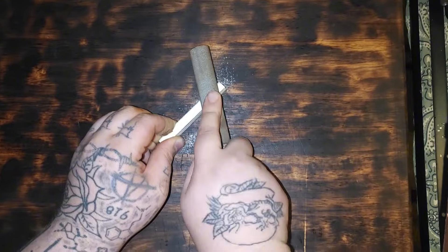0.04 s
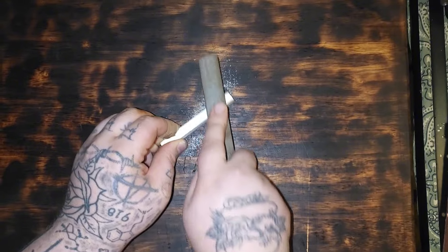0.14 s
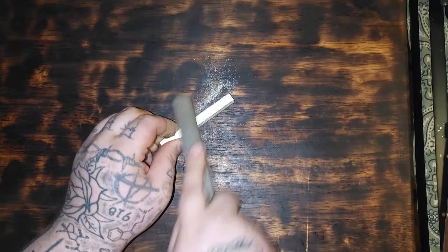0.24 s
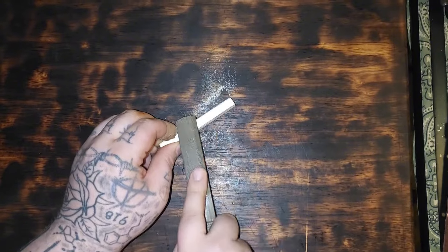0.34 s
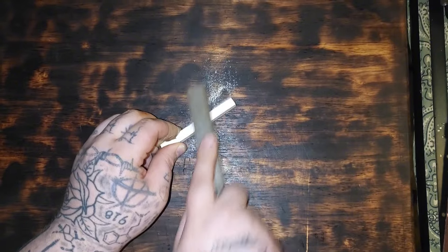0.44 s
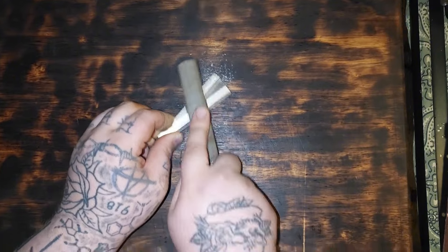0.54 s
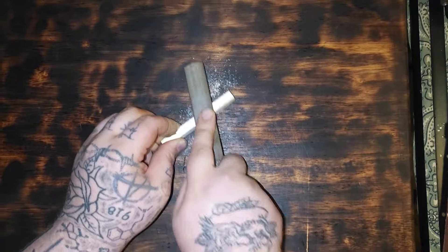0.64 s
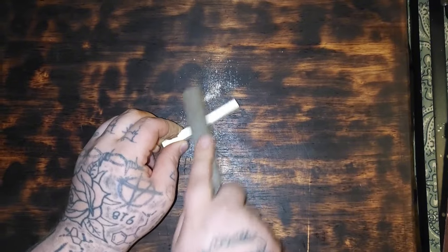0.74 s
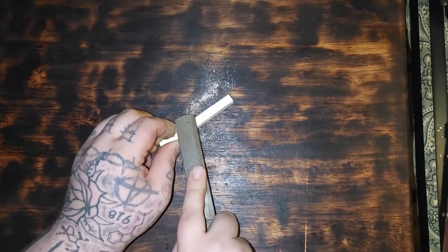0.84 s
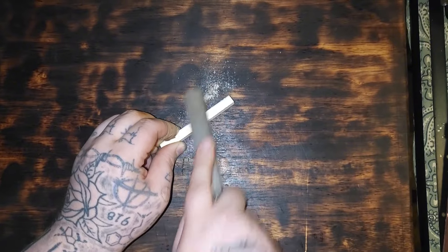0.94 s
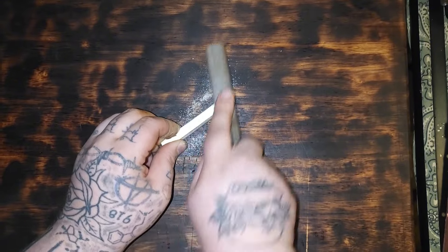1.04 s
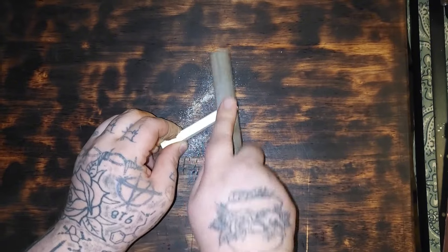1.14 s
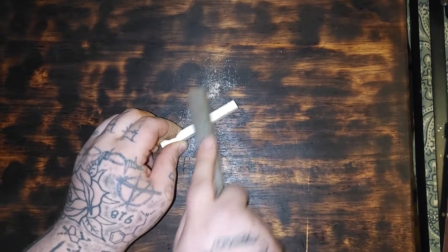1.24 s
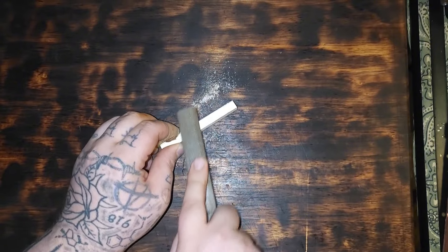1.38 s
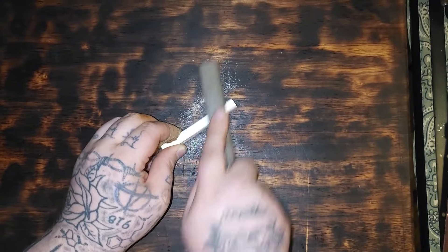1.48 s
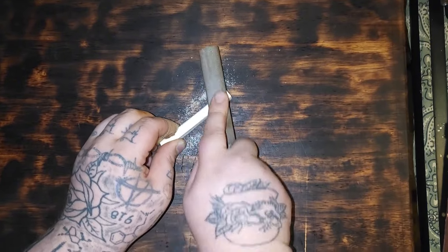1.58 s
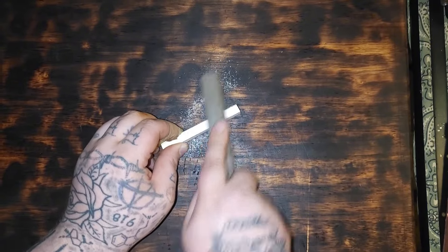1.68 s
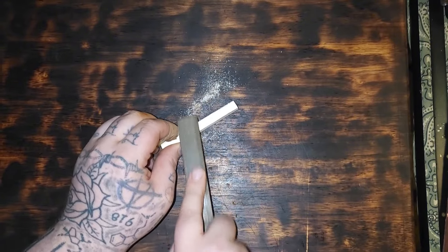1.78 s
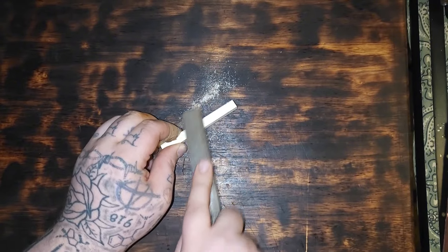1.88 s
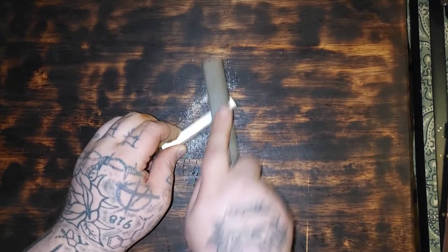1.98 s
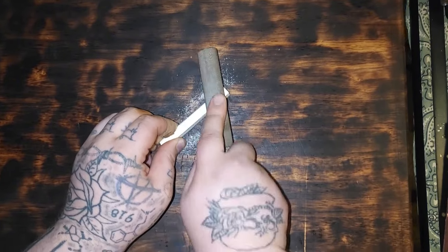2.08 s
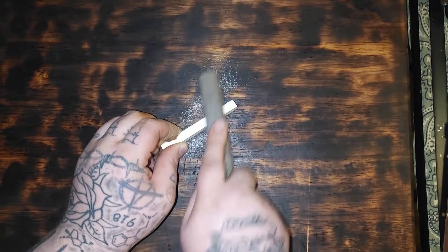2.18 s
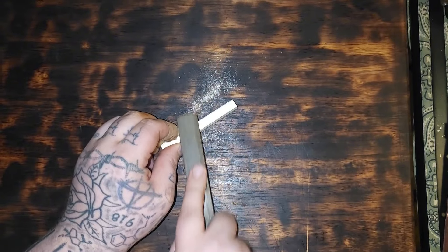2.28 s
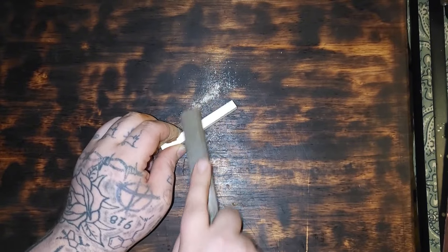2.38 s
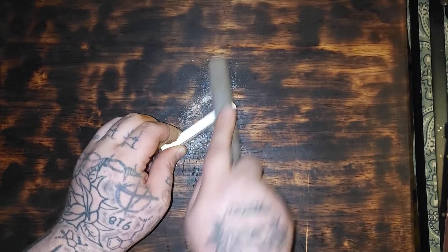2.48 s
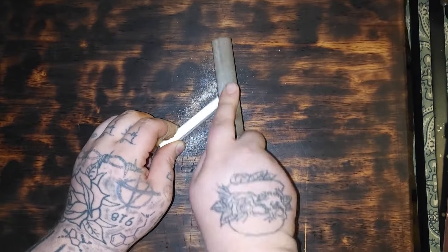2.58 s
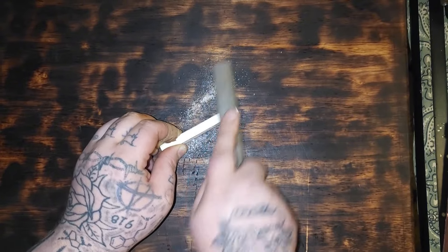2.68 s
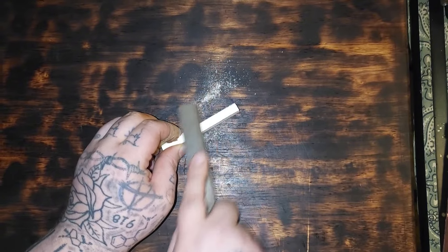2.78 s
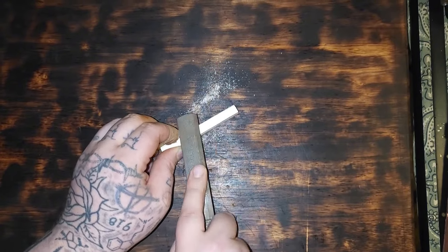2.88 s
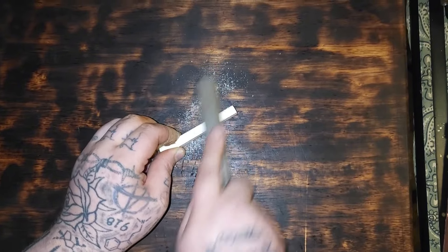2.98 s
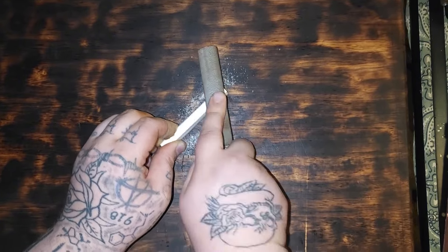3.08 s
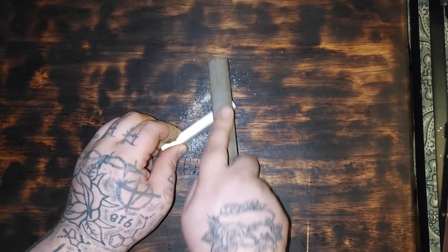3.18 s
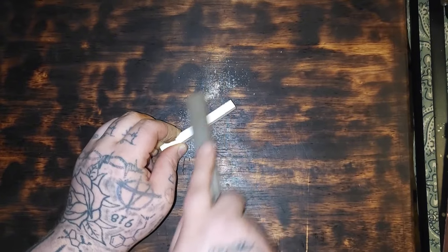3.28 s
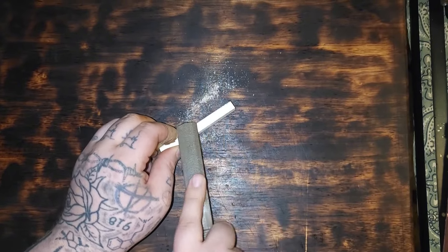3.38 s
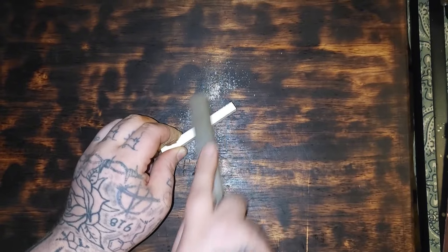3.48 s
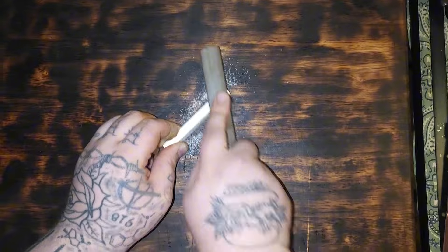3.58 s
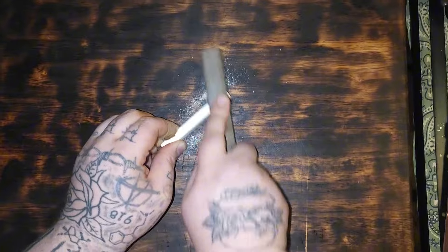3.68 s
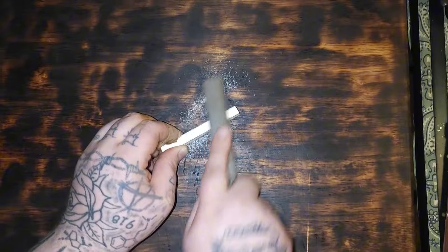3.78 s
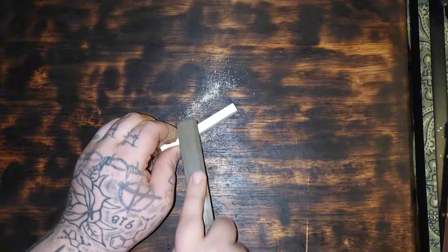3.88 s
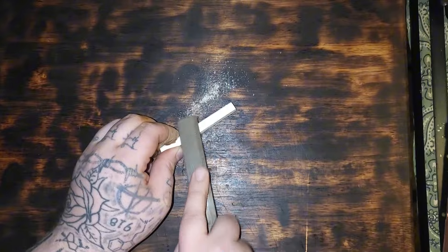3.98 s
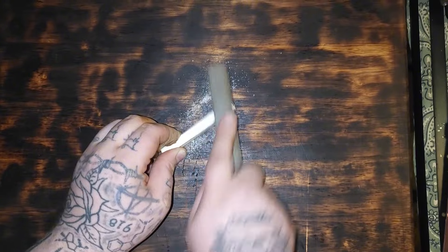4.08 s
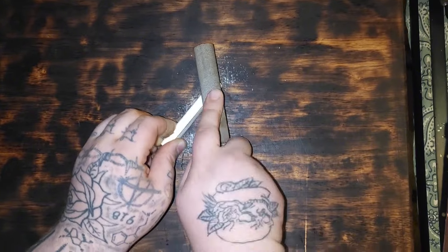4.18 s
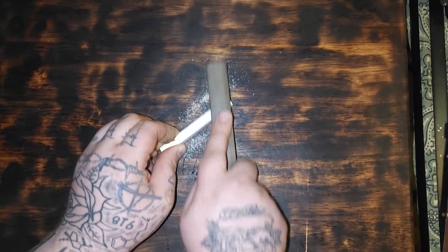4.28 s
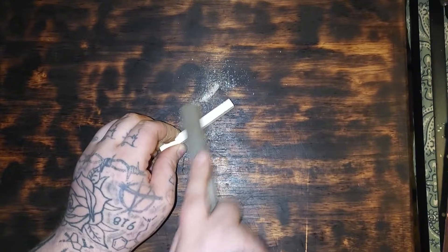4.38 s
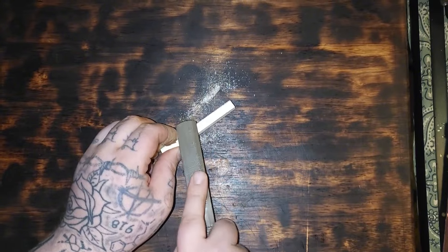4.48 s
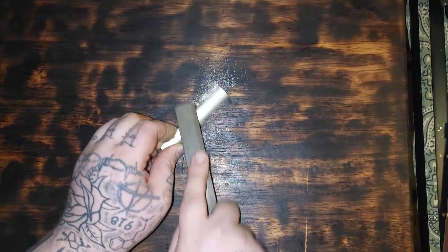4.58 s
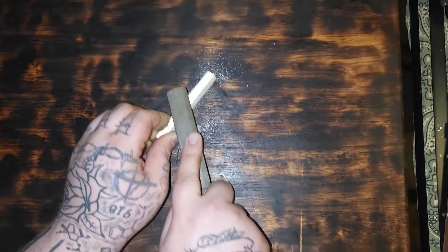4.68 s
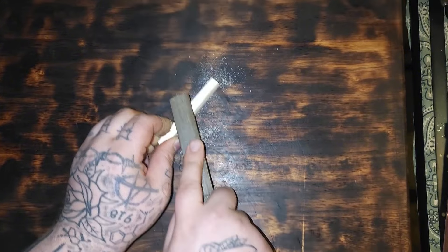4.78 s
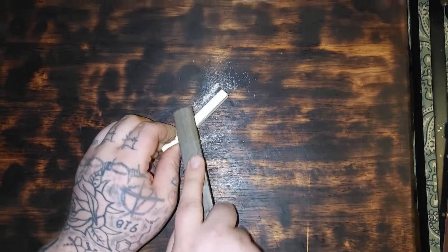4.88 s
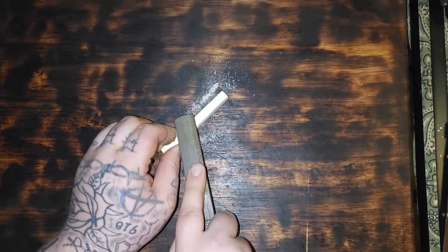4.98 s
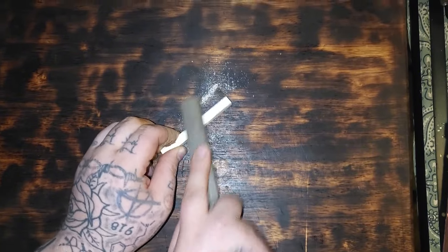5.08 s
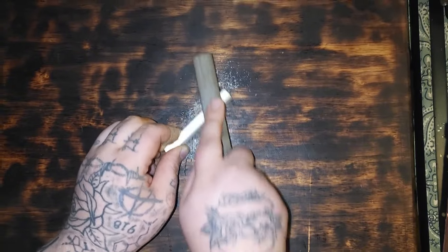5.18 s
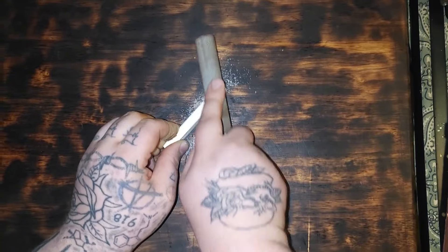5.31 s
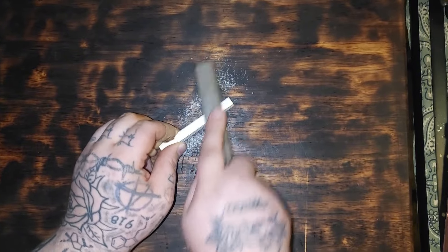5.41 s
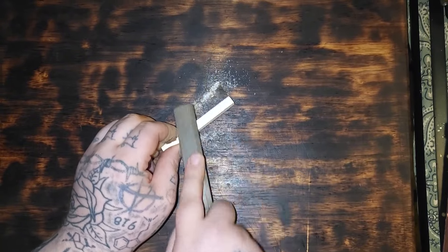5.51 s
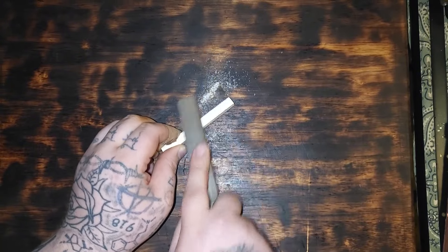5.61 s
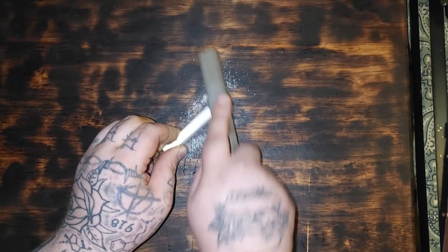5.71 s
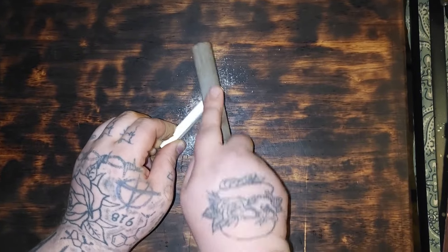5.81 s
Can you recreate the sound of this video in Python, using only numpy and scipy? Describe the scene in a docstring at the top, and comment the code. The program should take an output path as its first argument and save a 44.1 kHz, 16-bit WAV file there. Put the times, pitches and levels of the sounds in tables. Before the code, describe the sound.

A coarse metal rasp saws back and forth on a thin wooden stick, about two gritty strokes a second, rumbling a hollow wooden table up close.

```python
"""Rasping a thin stick

A steel rasp works back and forth on a stick held against a wooden table, close to the microphone.
On each push, rows of teeth bite ever slower and shake the table; noise pulls are lighter and duller.
Noise bursts through resonant bodies make snags, stick taps and one knock; blade modes ring faintly.
A low two-tone hum and filtered-noise air lie under a small room of diffuse echoes."""
import sys
import numpy as np
from scipy import signal
from scipy.fft import rfft, irfft
from scipy.io import wavfile
from scipy.ndimage import uniform_filter1d

SR = 44100
rng = np.random.default_rng(int(sys.argv[2]) if len(sys.argv) > 2 else 0)


def to_wav(sig):
    """Store sig (one row per channel, or 1-D mono) as 16-bit WAV at the path in sys.argv[1].

    Samples outside -1..1 are clipped; the rate is SR.
    """
    pcm = np.clip(np.atleast_2d(sig), -1, 1) * 32767
    pcm = np.round(pcm).astype(np.int16)
    wavfile.write(sys.argv[1], SR, pcm.T)  # frames by channels


N = 257984
TIME_S = np.arange(N) / SR
EARS = np.array([[1], [-1]])  # sign at left, right

# All levels are relative unless marked otherwise.
# Forward strokes: [crest_s, rise_s, hold_s, shake_db, scrape_db, start_teeth_hz, crest_teeth_hz]
PUSH_STROKES = [(0.46, 0.056, 0.014, -15.5, -30.5, 622, 399), (.998, 0.096, 0.067, -17, -33, 718.7, 386),
                (1.497, 0.093, 0.01, -15, -29, 519.8, 368.9), (1.98, 0.11, 0.017, -13.5, -31, 680.5, 330.6),
                (2.481, 0.1, 0.045, -14, -30, 678, 345.3), (3.01, 0.079, 0.0097, -14.5, -30.5, 640, 254.7),
                (3.538, 0.1, .018, -13.5, -29.5, 618.2, 265.6),
                (4.082, 0.1, .011, -13, -29.5, 700.6, 310.4), (4.577, 0.033, 0.026, -19, -38, 676, 391.5),
                (5.167, .12, 0.0053, -14, -30.5, 459.6, 365.3),
                (5.669, 0.06, 0.047, -15.5, -32.5, 494.5, 367.6)]
# Drags, firm on the way back, light when skidding or set down: [start_s, length_s, shake_db, scrape_db]
PULL_STROKES = [(-.081, 0.092, -26.5, -40.5), (0.197, 0.12, -26, -37), (0.577, 0.016, -32.5, -34.5),
                (0.734, 0.087, -25, -39.5), (1.187, 0.12, -23, -37.5), (1.674, 0.13, -22, -35.5),
                (2.134, .04, -54, -55), (2.175, 0.14, -25, -38), (2.681, 0.13, -23, -37),
                (3.13, 0.077, -40, -43), (3.239, .115, -23.5, -37), (3.692, 0.063, -33, -47),
                (3.788, 0.08, -20.5, -33.5), (4.225, 0.076, -39, -50.5), (4.327, 0.1, -23, -37),
                (4.896, 0.069, -35, -64), (5.265, 0.04, -23, -36.5), (5.336, 0.049, -39, -49),
                (5.414, 0.095, -22, -34.5)]
# Spans where the faint resting rub between strokes is quieter: [from_s, to_s]
QUIET_RUB_SPANS = [(.62, 0.9), (4.7, 5.02)]

# Stroke settings, each: [table_shake, scrape]
# Level gained while a push leans in [db, db]
LEAN_IN_DB = (17, 14.5)
# Exponent of that gain; above 1 the level rises early and flattens toward the crest [no unit, no unit]
LEAN_IN_CURVE = (0.97, 1.43)
# Pull weaker at its ends than halfway [db, db]
PULL_ARCH_DB = (2.5, 3)
# Slopes before and after strokes [db_per_s, db_per_s]
ONSET_DB_PER_S = (900, 640)
PUSH_FALL_DB_PER_S = (488, 356)
PULL_FALL_DB_PER_S = (360, 349)
# Rasp only lying on the stick while the hand turns round [db, db]
RESTING_DB = (-45.5, -56.5)
# Spread of the uneven hand pressure [db, db]
PRESSURE_SPREAD_DB = (1.5, 1)
PRESSURE_RATE_HZ, QUIET_RUB_DB = 35, -11.5
# Tooth rate halves in HALVING_S, down to a share of the crest rate
HALVING_S, SLOWEST_SHARE = 0.068, 0.93

# Table top outline: [freq_hz, level_db]
TABLE_OUTLINE = [(60, -29), (150, -24), (225, -21), (270, -11), (400, -6), (480, -14), (650, -14.5),
                 (900, -17.5), (1250, -21), (1550, -40), (3000, -79.5)]
# Table modes; a negative one is a node at the microphone: [freq_hz, width_hz, level_db]
TABLE_RESONANCES = [(290, 21, 6.5), (359.3, 38.7, 11.5), (397.8, 34.4, 5.5), (640, 58, 2), (721, 33, -25.5),
                    (773, 44, 6.5), (1197.3, 56, 14.5)]
# Lowest table mode, stronger when leaned on: [freq_hz, width_hz, level_db]
PRESSED_RESONANCE = (277, 18, 5.6)
# Scrape outlines on push and pull: [freq_hz, level_db]
PUSH_OUTLINE = [(500, -7.5), (1100, 3.5), (1600, -1), (2800, -1), (4500, -2.5), (6200, -5.5), (8100, -7.5),
                (9500, -21.5), (11400, -12), (16000, -20)]
PULL_OUTLINE = [(500, -7.5), (1100, -1), (1600, 0.5), (2450, 1.5), (3400, -1), (4900, -6), (6300, -6),
                (8100, -9), (9500, -21.5), (11400, -14.5), (16000, -18)]
# Modes of rasp and stick: [freq_hz, width_hz, level_db]
RASP_RESONANCES = [(1389, 19, 7.9), (1558, 13, 8.1), (1835, 31, 6.2), (2378, 70, 6.7), (3167, 46, 10.8),
                   (3230, 21, 8.5), (3478, 26, 9.3)]

# Tooth snags and breaks free: [time_s, snap_db, thump_db]
SNAG_BLOWS = [(.193, -17.5, -39), (.375, -20, -22.5), (.419, -21, -26), (.474, -22, -10.5),
              (.875, -23, -34), (1.003, -12.5, -3), (1.362, -17, -18.5), (1.418, -20, -23),
              (1.496, -24, -3.5), (1.669, -36, -15), (2.001, -11.5, -10.5), (2.478, -14, -4.5),
              (2.918, -13.5, -21), (2.995, -10, -10), (3.023, -17, -11), (3.127, -17.5, -49),
              (3.399, -13.5, -20), (3.542, -9, -5), (3.945, -12, -22.5), (4.076, -5.5, -38),
              (4.086, -15, -4), (4.327, -22, -11), (5.047, -34, -16.5), (5.165, -15, -10), (5.178, -14, -8),
              (5.321, -13, -31), (5.665, -12.5, -7), (5.687, -7.5, -10)]
# Stick scuffs against the table: [time_s, clack_db, thump_db]
TAP_BLOWS = [(.1, -23.5, -28), (2.045, -30, -53), (3.141, -14, -28), (3.6, -33, -45), (3.675, -22.5, -27),
             (4.22, -31, -28), (4.524, -31, -31), (4.725, -45, -38), (5.225, -36, -51), (5.26, -26, -18)]
# Rasp slips and strikes: [time_s, crack_db, thump_db]
KNOCK_BLOWS = [(.5712, 1, -4)]
# Outlines of snapping fibre, tapped stick, struck rasp: [freq_hz, level_db]
SNAP_OUTLINE = [(400, -14), (1100, 9.5), (3500, -4.5), (5800, 9), (7800, 3), (9500, -14), (11500, -4),
                (16000, 3.5)]
TAP_OUTLINE = [(300, -16), (950, -5), (1400, 2), (2000, -16), (5500, -10.5), (9500, -27), (16000, -14.5)]
KNOCK_OUTLINE = [(100, -90), (700, 3), (2200, 5), (4500, 0.5), (5400, -1), (6100, -3.5), (8000, 1.5),
                 (9400, -16), (12000, -7), (16000, -29)]
# Modes of tapped stick, struck rasp: [freq_hz, width_hz, level_db]
STICK_RESONANCES = [(1440, 420, 3)]
KNOCK_RESONANCES = [(1190, 130, 10), (1600, 200, -8), (1965, 200, 0), (2358, 200, 8), (3170, 250, 4),
                    (4400, 300, 5), (7680, 300, 3)]
# Lasting ring of the steel blade: [freq_hz, level_db]
BLADE_TONES = [(1862, -4), (3160, 0), (3222, -4)]

# Appliance hum: [freq_hz, rms_db]
HUM_TONES = [(58.2, -49), (96.4, -40)]
# Room air spectrum: [freq_hz, level_db_per_hz]
AIR_OUTLINE = [(20, -20), (55, 9.5), (130, 1.5), (210, -2.5), (370, -2.5), (700, -15.5), (1500, -24),
               (3000, -47), (7000, -28.5), (9500, -49.5), (12000, -34), (16000, -48)]


def undb(db):
    """Amplitude gain from dB."""
    return 10 ** (np.asarray(db) / 20)


def unit(x):
    """Scale to rms 1."""
    return x / np.sqrt(np.mean(x ** 2))


def steady(x, span_s):
    """Even out the running rms over span_s to about 1, keeping the faster grain."""
    power = np.abs(uniform_filter1d(x ** 2, max(int(span_s * SR), 8)))
    return x / np.sqrt(power + 1e-12)


def response(outline, modes=(), size=8192):
    """Causal, minimum-phase impulse response of a body with this outline and these resonances."""
    hz = np.arange(size // 2 + 1) * SR / size + 1
    points = np.array(outline, float)
    db = np.interp(np.log(hz), np.log(points[:, 0]), points[:, 1])
    for centre_hz, width_hz, peak_db in modes:
        db = db + peak_db / (1 + (2 * (hz - centre_hz) / width_hz) ** 2)
    # fold the cepstrum to positive time
    cepstrum = irfft(np.log(undb(db)))
    cepstrum[1:size // 2] *= 2
    cepstrum[size // 2 + 1:] = 0
    return irfft(np.exp(rfft(cepstrum)))[:size // 2]


def ring(force, body):
    """Force (one channel or two) sounding through an impulse response."""
    kernel = body if force.ndim == 1 else body[None]
    return signal.fftconvolve(force, kernel)[..., :N]


def walk(rate_hz):
    """Smooth random wander of rms 1."""
    step = max(int(SR / rate_hz), 2)
    held = np.repeat(rng.standard_normal(N // step + 1), step)
    return unit(uniform_filter1d(held, step)[:N])


def strokes(table, pressed, push_s=0.134, follow_s=0.0824):
    """The rasp goes forward around each crest and is drawn back in between."""
    shake, scrape = effort(0), effort(1)
    left_s, tooth_hz = to_stall()
    pushing = (left_s < push_s) & (left_s > -follow_s)
    forward = uniform_filter1d(1. * pushing, size=400)
    pushed = push(pressed, shake, scrape, tooth_hz)
    pulled = pull(table, shake, scrape)
    return forward * pushed + (1 - forward) * pulled


def push(table, shake, scrape, tooth_hz, skim_db=-6):
    """Each row of teeth rocks the table and tears a burst of fibres."""
    bite = np.cos(2 * np.pi * tooth_phase(tooth_hz, jitter=0.15))
    grip = np.exp(0.6 * bite)
    tearing = undb(10) * unit(rng.standard_normal(N) * grip)
    force = bite * undb(3.5 * walk(300)) + tearing
    body = ring(force, table)
    # fast-skimming teeth drive the low modes less
    low = signal.sosfiltfilt(signal.butter(4, 450, fs=SR, output="sos"), body)
    skim = np.clip(np.log2(tooth_hz / 380), 0, 1)
    body = steady(body + (undb(skim_db * skim) - 1) * low, 0.017)
    hiss = scrape_noise(grip * undb(1.2 * walk(150)), PUSH_OUTLINE,
                        rate_hz=9000, spread_db=-1.0, side_db=-2.0, shift_db=1.98)
    return shake * body + scrape * hiss


def pull(table, shake, scrape, judder_db=1.0):
    """The backs of the teeth skid unevenly over the wood."""
    grip = undb(judder_db * walk(220))
    body = steady(ring(rng.standard_normal(N) * grip, table), 0.047)
    hiss = scrape_noise(grip, PULL_OUTLINE, rate_hz=11000, spread_db=0.0, side_db=-1.5, shift_db=3.0)
    return shake * body + scrape * hiss


def to_stall():
    """Seconds to the nearest push crest, and the tooth rate, which falls as the teeth dig in."""
    crest_s, *_, top_hz, crest_hz = np.transpose(PUSH_STROKES)
    nearest = np.searchsorted((crest_s[1:] + crest_s[:-1]) / 2, TIME_S)
    left_s = crest_s[nearest] - TIME_S
    slowing = np.maximum(2 ** (left_s / HALVING_S), SLOWEST_SHARE)
    return left_s, np.minimum(crest_hz[nearest] * slowing, top_hz[nearest])


def tooth_phase(tooth_hz, jitter):
    """Unevenly spaced rows of teeth passed so far."""
    return np.cumsum(tooth_hz * np.exp(jitter * walk(400))) / SR


def scrape_noise(grip, outline, rate_hz, spread_db, side_db, shift_db):
    """Fibres tear across the blade: ears get different grains; colour shifts as the contact moves."""
    body = response(outline, RASP_RESONANCES)
    mid = ring(crackle(rate_hz, spread_db) * grip, body)
    side = ring(crackle(rate_hz, spread_db) * grip, body)
    hiss = steady(mid, 0.068) + EARS * undb(side_db) * steady(side, 0.045)
    for hz in np.geomspace(1700, 6500, 5):
        band = signal.lfilter(*signal.iirpeak(hz, 4, fs=SR), hiss)
        hiss = hiss + (undb(shift_db * walk(12)) - 1) * band
    return hiss


def crackle(rate_hz, spread_db):
    """Tearing fibres: dense random clicks, with sizes spread exponentially in dB."""
    size = undb(spread_db * np.minimum(rng.exponential(size=N), 3.8))
    clicks = rng.random(N) < rate_hz / SR
    return unit(clicks * size * rng.standard_normal(N))


def effort(layer):
    """Gain of shake (layer 0) or scrape (layer 1): strokes over the faint rub of the resting rasp."""
    in_span = sum(1. * ((TIME_S > from_s) & (TIME_S < to_s)) for from_s, to_s in QUIET_RUB_SPANS)
    quieter = uniform_filter1d(in_span, size=1500)
    power = undb(RESTING_DB[layer] + QUIET_RUB_DB * quieter) ** 2
    for db in (*push_db(layer), *pull_db(layer)):
        heard = db > -90
        power[heard] += undb(db[heard]) ** 2
    return np.sqrt(power) * undb(PRESSURE_SPREAD_DB[layer] * walk(PRESSURE_RATE_HZ))


def push_db(layer):
    """Level of every push: the hand leans in up to the crest, holds and lets go."""
    for crest_s, rise_s, hold_s, *peak_db, _ in PUSH_STROKES:
        early_s = np.maximum(crest_s - TIME_S, 0)
        swell = LEAN_IN_DB[layer] * (early_s / rise_s) ** LEAN_IN_CURVE[layer]
        attack = ONSET_DB_PER_S[layer] * np.maximum(early_s - rise_s, 0)
        release = PUSH_FALL_DB_PER_S[layer] * np.maximum(TIME_S - crest_s - hold_s, 0)
        yield peak_db[layer] - swell - attack - release


def pull_db(layer):
    """Level of every pull: quick start, shallow arch as the hand speeds up and slows, release."""
    for start_s, length_s, *peak_db in PULL_STROKES:
        position = np.clip(2 * (TIME_S - start_s) / length_s - 1, -1, 1)
        arch = PULL_ARCH_DB[layer] * position ** 2
        attack = ONSET_DB_PER_S[layer] * np.maximum(start_s - TIME_S, 0)
        release = PULL_FALL_DB_PER_S[layer] * np.maximum(TIME_S - start_s - length_s, 0)
        yield peak_db[layer] - arch - attack - release


def catches(snap_db=8, thump_db=4):
    """Teeth catch as each pull sets off, as hard as the pull itself: rows like those of the snags."""
    return [(start_s, scrape_db + snap_db, shake_db + thump_db)
            for start_s, _, shake_db, scrape_db in PULL_STROKES if start_s > 0]


def blows(rows, body, table, crunch_s, lead_s, thump_db, size=1024):
    """Each blow is a brief noise crunch in the struck part and one shove into the table."""
    out = np.zeros(2 * N)
    t = np.arange(size) / SR - size / 4 / SR
    swell = np.exp(np.minimum(t / lead_s, -t / crunch_s))
    shove = np.convolve(table, np.hanning(SR // 1000))  # wood gives way for about a millisecond
    thump = undb(thump_db) * shove / np.abs(shove).max()
    for time_s, crack_db, shove_db in rows:
        crack = signal.fftconvolve(swell * rng.standard_normal(size), body)
        i = int(time_s * SR)
        out[i - size // 4:][:len(crack)] += undb(crack_db) * crack / np.abs(crack).max()
        out[i:i + len(thump)] += undb(shove_db) * thump
    return out[:N]


def blade(x, t60_s=1.3, ring_db=-81):
    """The work excites decaying sine modes of the steel, which sing on faintly between strokes."""
    t = TIME_S[:SR]
    modes = sum(undb(db) * np.sin(2 * np.pi * hz * t) for hz, db in BLADE_TONES)
    return undb(ring_db) * ring(x, modes * np.exp(-np.log(1000) * t / t60_s))


def reflections(x, t60_s, low_hz, delay_s):
    """Diffuse echoes, different at each ear, weak in the bass and dulled by the furnishings."""
    t = np.arange(SR // 2) / SR
    tails = rng.standard_normal((2, len(t))) * np.exp(-np.log(1000) * t / t60_s)
    tails /= np.sqrt(np.sum(tails ** 2, axis=1, keepdims=True))
    tails = signal.sosfilt(signal.butter(2, low_hz, "high", fs=SR, output="sos"), tails)
    tails = signal.sosfilt(signal.butter(1, 6000, fs=SR, output="sos"), tails)
    late = np.pad(x, (int(delay_s * SR), 0))
    return np.array([ring(late, tail) for tail in tails])


def background(air_db=-46, waver_db=-0.5):
    """Slightly wavering sines of an appliance hum over filtered noise for the quiet room air."""
    hum = 0
    for hz, db in HUM_TONES:
        tone = np.sqrt(2) * np.sin(2 * np.pi * (hz * TIME_S + rng.random()))
        hum = hum + undb(db) * tone * undb(waver_db * walk(6))
    air = unit(ring(rng.standard_normal(N), response(AIR_OUTLINE)))
    return hum + undb(air_db) * air


def scene(room_db=-16, left_db=1.23):
    """Strokes and blows share the table, a little to the left, in a small dry room."""
    table = response(TABLE_OUTLINE, TABLE_RESONANCES)
    pressed = response(TABLE_OUTLINE, TABLE_RESONANCES + [PRESSED_RESONANCE])
    snap = response(SNAP_OUTLINE)
    stick = response(TAP_OUTLINE, STICK_RESONANCES)
    rasp = response(KNOCK_OUTLINE, KNOCK_RESONANCES)
    work = strokes(table, pressed)
    work = work + blows(SNAG_BLOWS + catches(), snap, pressed,
                        crunch_s=0.0013, lead_s=0.00018, thump_db=-3.5)
    work = work + blows(TAP_BLOWS, stick, table, crunch_s=0.0096, lead_s=0.00051, thump_db=3.5)
    work = work + blows(KNOCK_BLOWS, rasp, table, crunch_s=0.00065, lead_s=0.00077, thump_db=0.5)
    mid = work.mean(axis=0)
    room = undb(room_db) * reflections(mid, t60_s=0.26, low_hz=358, delay_s=0.005)
    direct = np.array([work[0], np.roll(work[1], 1)])  # right is one sample later
    return (direct + room + blade(mid)) * undb(EARS * left_db) + background()


def record(dry, top_hz=15900):
    """The recorder clips at full scale, then cuts the top steeply."""
    lowpass = signal.ellip(10, 0.2, 80, top_hz, fs=SR, output="sos")
    return signal.sosfilt(lowpass, np.clip(dry, -1, 1))


dry = scene()
out = record(dry)
to_wav(out)
```